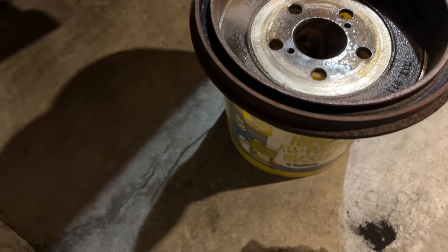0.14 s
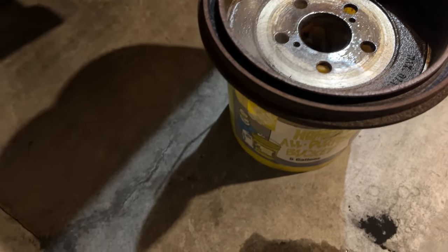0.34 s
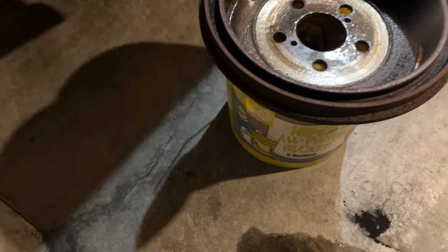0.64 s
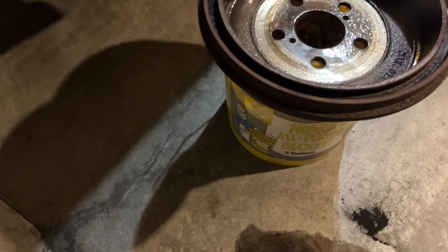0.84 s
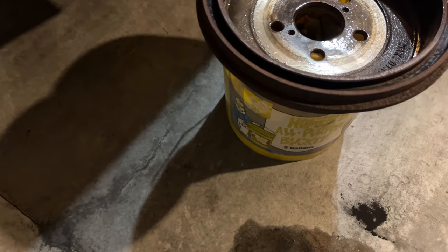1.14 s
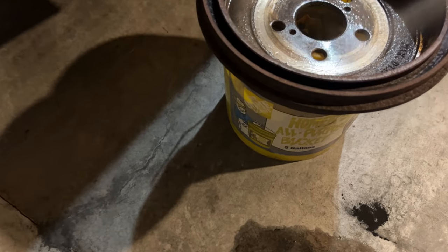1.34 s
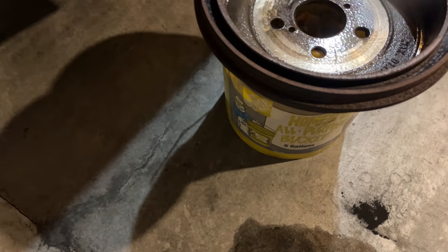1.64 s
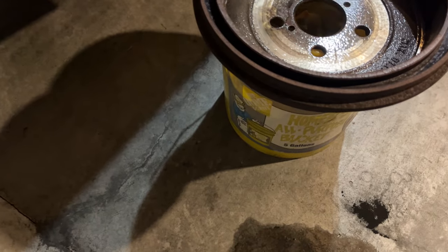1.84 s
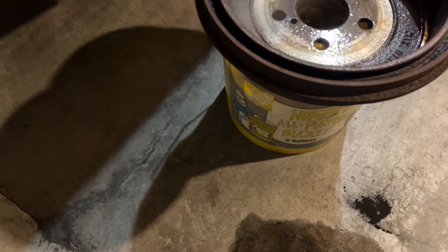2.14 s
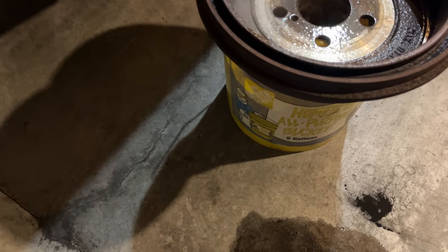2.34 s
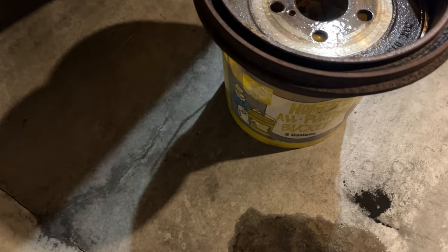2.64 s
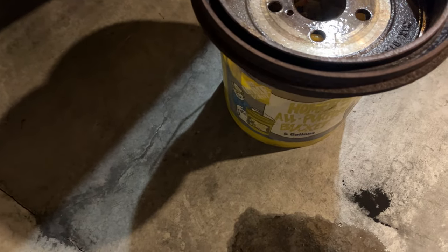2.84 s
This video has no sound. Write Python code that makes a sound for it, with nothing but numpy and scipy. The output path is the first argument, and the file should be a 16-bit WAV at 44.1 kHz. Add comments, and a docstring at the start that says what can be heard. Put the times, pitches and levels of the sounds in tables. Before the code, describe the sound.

An aerosol spray hisses abruptly into a metal brake drum from about 0.04 to 0.92 s, bright and finely sputtering, with rougher, splashy buffeting around 0.43-0.75 s. It cuts off, leaving a short garage tail and faint low rumble. From 1.17 s a longer, more hollow-coloured hiss runs to the end near 3 s, its resonances shifting as the jet moves, with faint low bottle-like flutters around 1.2-1.9 s.

```python
"""In a garage, an aerosol can sprays a metal brake drum lying on a bucket: a short burst, then a longer one.
The hiss is noise with droplet ticks, coloured by the drum's air and combed by reflections that follow the hand.
Resonant bands glide through it; buffeting on an edge adds low turbulence and a bright splash of noise.
The hollow under the drum is a wavering sine, like a blown bottle.
A short noise tail makes the garage ring, over a steady low rumble of filtered noise."""
import sys
import numpy as np
from scipy import signal
from scipy.fft import rfft, irfft, next_fast_len
from scipy.io import wavfile
from scipy.ndimage import map_coordinates

SR = 44100
rng = np.random.default_rng(int(sys.argv[2]) if len(sys.argv) > 2 else 0)


def wav_out(sig):
    """Save sig, one row per channel (or a flat mono array), as 16-bit PCM at SR to the path in sys.argv[1]."""
    wavfile.write(sys.argv[1], SR, np.round(np.clip(np.atleast_2d(sig).T, -1, 1) * 32767).astype(np.int16))


N = 132300
T = np.arange(N) / SR
SIZE = next_fast_len(N + SR)  # padded so that filter tails have room
HZ = np.maximum(np.arange(SIZE // 2 + 1) * SR / SIZE, 1)


def from_db(db):
    """Decibels to gain."""
    return 10 ** (np.asarray(db) / 20)


def rms_one(x):
    """Scale to rms 1."""
    return x / np.sqrt(np.mean(x ** 2) + 1e-20)


def in_time(rows):
    """Draw a table's automation curve at every sample."""
    return np.interp(T, *np.transpose(rows))


def in_hz(rows, axis=1):
    """Draw one column of a table at every frequency, along a log frequency axis."""
    rows = np.array(rows)
    return np.interp(np.log(HZ), np.log(rows[:, 0]), rows[:, axis])


def filtered(x, response):
    """Apply a frequency response."""
    return irfft(rfft(x, SIZE) * response, SIZE)[..., :N]


def noise(response):
    """Two unrelated coloured noises, together of rms 1."""
    return rms_one(filtered(rng.standard_normal((2, SIZE)), response))


def resonance(hz, width_hz):
    """Response of one resonance, 1 on top."""
    return 1 / (1 + 1j * (HZ / hz - hz / HZ) * hz / width_hz)


def drift(hz):
    """Random wander, mostly slower than the given rate, spread about 1."""
    return noise(1 / (1 + (HZ / hz) ** 2))[0]


def gate(start, end, attack, release):
    """Swell softly, hold and die away; all arguments in seconds."""
    swell = (1 - np.exp(-np.maximum(T - start, 0) / attack)) ** 2
    fade = np.exp(-np.maximum(T - end, 0) / release)
    return swell * fade


# Colour of the garage's background: f/Hz, level/dB (per Hz, relative)
RUMBLE_COLOUR = [(20, -31), (38, -13.5), (58, 0.5), (75, -3), (110, -7.5), (170, -18), (270, -28),
                 (900, -49), (1800, -30), (2700, -48), (4500, -46), (9000, -46), (16000, -59.5)]
RUMBLE_DB = -53.5


def garage_rumble():
    """Steady broadband noise, heaviest in the bass, as the bed of the garage."""
    return from_db(RUMBLE_DB) * noise(from_db(in_hz(RUMBLE_COLOUR)))


# Spells with the valve held down: start t/s, end t/s
VALVE_PRESSES = [(0.039, 0.92), (1.169, 3.1)]
ATTACK_S, RELEASE_S = 0.01, 0.012


def valve_gates():
    """Each press lets the spray swell quickly and each release lets it die away."""
    return [gate(start, end, ATTACK_S, RELEASE_S) for start, end in VALVE_PRESSES]


# Strength of the hiss as the jet wanders over the metal: t/s, level/dB
JET_FLOW = [(0.05, -2.5), (0.09, 0.5), (0.28, 1), (0.425, 4), (0.445, 4), (0.56, 3.5), (0.71, -0.5),
            (0.745, 2), (0.9, -0.8), (1.19, 0), (1.45, 1.9), (1.6, -0.9), (1.73, 1.4), (1.83, -0.05),
            (2.26, 3), (2.5, 0.95), (2.79, 0.5), (3.0, -1)]
# Colour of the jet: f/Hz, level/dB (per Hz, relative)
JET_COLOUR = [(60, -22), (200, -11.5), (330, -13), (520, -12.5), (800, -11.5), (1200, -13), (2100, -10),
              (3000, -7), (4400, -4), (5000, -4), (5600, -5), (6400, -4), (7400, 2), (8400, -7),
              (9400, 0.5), (11000, -1.34), (12900, 2), (14000, 0.3), (14800, -4), (15600, -1)]
# Air resonances of the drum: f/Hz, width f/Hz, level/dB re plain hiss in the first burst, in the second
DRUM_MODES = [(533, 85, 1, 3), (1250, 112, 5.5, 9), (1624, 240, 6, 11.5), (1890, 120, 2.5, 7),
              (2396, 210, 1, 3), (3230, 96, -1.5, -5), (3600, 250, -3, -8.5), (4060, 200, -10, -2.5),
              (4650, 160, 2.5, -3), (5660, 130, -5, 5.5), (6000, 160, 3, -25)]
HISS_DB = -28
DROPS_PER_S, DROP_SPREAD_DB, DROPS_DB = 2500, 4.5, -7.5  # last one relative to the raw hiss


def jet(press):
    """Gas turbulence hisses and droplets tick; the air in the drum resonates with both."""
    size_db = DROP_SPREAD_DB * np.minimum(rng.exponential(1, (2, N)), 5)
    sizes = from_db(size_db) * rng.choice([-1, 1], (2, N))
    landed = rng.random((2, N)) < DROPS_PER_S / SR
    drops = rms_one(sizes * landed)
    stream = rng.standard_normal((2, N)) + from_db(DROPS_DB) * drops
    # plain hiss and modes add as powers
    mode_power = sum(np.abs(from_db(db[press]) * resonance(hz, width)) ** 2
                     for hz, width, *db in DRUM_MODES)
    colour = from_db(in_hz(JET_COLOUR)) * np.sqrt(1 + mode_power)
    return from_db(HISS_DB + in_time(JET_FLOW)) * rms_one(filtered(stream, colour))


# Bands that ring (+) or cancel (-) while the jet crosses one part of the drum:
# start t/s, end t/s, from f/Hz, to f/Hz, width f/Hz, level/dB
BAND_SWEEPS = [ (0.0, 0.423, 2790, 2490, 170, 4.5), (0.0, 0.33, 3170, 3160, 140, -10),
               (0.0, 0.413, 4970, 4960, 190, -10), (0.0, 0.42, 6160, 6700, 170, -5),
               (0.0, 0.3, 3700, 4080, 160, 3), (0.2, 0.44, 1910, 1770, 140, 5.5),
               (0.28, 0.58, 4270, 4430, 292, 5.5), (0.55, 0.93, 11700, 11640, 220, 2),
               (0.68, 0.928, 3300, 3400, 170, 4.5), (0.72, 0.93, 5440, 5600, 140, 10),
               (1.15, 1.85, 5240, 5300, 170, 7.5), (1.9, 2.41, 5100, 5150, 202, -6.5),
               (1.95, 2.36, 4300, 4400, 400, 3.5), (2.12, 2.4, 6270, 6140, 230, 4.5),
               (2.0, 2.4, 10600, 10400, 500, 2.5), (2.38, 3.1, 1570, 1550, 70, -10),
               (2.425, 3.1, 7630, 7600, 480, 7), (2.61, 2.916, 4140, 4300, 220, 6.5)]
SWEEP_FADE_S = 0.05


def gliding_bands(x):
    """Resonant bands and notches glide through the hiss as the jet moves over the drum."""
    hz, s, spectra = signal.stft(x, SR, nperseg=1024, noverlap=768)
    gain_db = 0
    for start, end, from_hz, to_hz, width_hz, db in BAND_SWEEPS:
        held = (np.tanh((s - start) / SWEEP_FADE_S) - np.tanh((s - end) / SWEEP_FADE_S)) / 2
        centre = np.interp(s, [start, end], [from_hz, to_hz])
        bell = np.exp(-((hz[:, None] - centre) / width_hz) ** 2)
        gain_db = gain_db + db * held * bell
    return signal.istft(spectra * from_db(gain_db), SR, nperseg=1024, noverlap=768)[1][:, :N]


SPUTTER_DB, SPUTTER_HZ = 0.4, 250  # fast roughness
SURGE_DB, SURGE_HZ = 0.84, 21.3  # slower unevenness


def sputter():
    """The spray's strength flickers at random, at a fast and a slower rate."""
    return from_db(SPUTTER_DB * drift(SPUTTER_HZ) + SURGE_DB * drift(SURGE_HZ))


# Extra travel time by way of the drum's far wall: t/s, lag/ms
FAR_WALL_LAG = [(0.06, 1.49), (0.2, 1.52), (0.45, 1.82), (0.58, 1.89), (0.8, 1.85), (1.19, 1.925),
                (1.5, 1.995), (1.62, 1.945), (1.73, 1.965), (1.86, 1.88), (2.02, 1.88), (2.23, 1.955),
                (2.33, 1.89), (2.46, 1.77), (2.57, 1.76), (2.75, 1.835), (2.92, 1.79)]
# Echoes off the stepped wall: time after that lag/ms (negative is earlier), gain (negative inverts)
WALL_BOUNCES = [(-.113, -.12), (0, .2), (.075, .05), (.125, -.08)]


def drum_walls(x):
    """Short reflections comb the spray, their delays following the hand."""
    lag = in_time(FAR_WALL_LAG)
    echoes = [sum(gain * map_coordinates(side, [(T - (lag + later) / 1000) * SR], order=3)
                  for later, gain in WALL_BOUNCES)
              for side in x]
    return x + np.array(echoes)


RING_DB, RING_T60_S, RING_ABOVE_HZ = -8, 0.04, 7000


def drum_ring(x):
    """The treble rings on briefly in the drum's many narrow air modes, as a decaying noise tail."""
    high = 1 - 1 / (1 + (HZ / RING_ABOVE_HZ) ** 4)
    tail = noise(high)[0] * from_db(-60 * T / RING_T60_S)
    ring = rms_one(tail) / np.sqrt(N)  # unit energy
    return x + from_db(RING_DB) * filtered(x, rfft(ring, SIZE))


# Colour of the garage's tail: f/Hz, level/dB
TAIL_COLOUR = [(150, -5.5), (600, -9), (1500, -2.5), (2300, -4), (4300, -2), (8000, 1), (15000, -5)]
ROOM_T60_S, ROOM_TREBLE_T60_S, ROOM_SPLIT_HZ = 0.42, 0.29, 5900
ROOM_DB, ROOM_BUILD_S = -9.5, 0.0035


def garage(x):
    """Diffuse reflections build up and decay as noise, the treble dying first."""
    bass = 1 / (1 + (HZ / ROOM_SPLIT_HZ) ** 4)
    low_tail = noise(bass) * from_db(-60 * T / ROOM_T60_S)
    high_tail = noise(1 - bass) * from_db(-60 * T / ROOM_TREBLE_T60_S)
    tail = (low_tail + high_tail) * (1 - np.exp(-T / ROOM_BUILD_S))
    response = from_db(in_hz(TAIL_COLOUR)) * rfft(rms_one(tail), SIZE) / np.sqrt(N)
    return from_db(ROOM_DB) * filtered(x, response)


# How hard the hollow under the drum is blown: t/s, level/dB
HOLLOW_LEVEL = [(0.05, -84), (0.6, -53), (0.9, -62.5), (1.2, -66.5), (1.26, -53), (1.34, -50), (1.39, -62),
                (1.44, -54), (1.53, -57.5), (1.61, -46.5), (1.66, -62), (1.72, -54.5), (1.82, -58),
                (1.875, -48.5), (1.95, -57.5), (2.3, -61.5), (2.6, -67.5)]
HOLLOW_HZ, HOLLOW_WAVER_HZ, HOLLOW_WAVER_RATE_HZ = 177, 13.8, 36
HOLLOW_FLUTTER_DB = 2.5


def hollow():
    """The air under the drum sounds like a blown bottle, wavering in pitch and strength."""
    pitch = HOLLOW_HZ + HOLLOW_WAVER_HZ * drift(HOLLOW_WAVER_RATE_HZ)
    level_db = in_time(HOLLOW_LEVEL) + HOLLOW_FLUTTER_DB * drift(HOLLOW_WAVER_RATE_HZ)
    tone = np.sin(2 * np.pi * np.cumsum(pitch) / SR)
    return from_db(level_db) * rms_one(tone)


# Moments when the jet catches an edge: start t/s, length t/s, level/dB
EDGE_BUFFETS = [(0.433, 0.079, -40.5), (0.518, 0.065, -39), (0.589, 0.046, -44), (0.635, 0.053, -44.5),
                (0.732, 0.021, -45), (2.8, 0.019, -44.5)]
# Colour of the low turbulence: f/Hz, level/dB (per Hz, relative)
BUFFET_COLOUR = [(25, -22), (70, 4.5), (110, 3), (160, -5), (240, 0.5), (340, -7.5), (540, 1.5),
                 (800, -18.5), (1150, -6.5), (3000, -32)]
# Colour of the bright splash: f/Hz, level/dB (per Hz, relative)
SPLASH_COLOUR = [(1000, -19), (4000, -15), (8000, -3), (10500, 3.5), (13000, 5.5), (15500, -5)]
BUFFET_FADE_S, SPLASH_DB = 0.0054, 12.5  # splash relative to the turbulence


def buffeting():
    """Low turbulence and a bright splash while the jet is on an edge."""
    force = sum(from_db(db) * gate(start, start + length, BUFFET_FADE_S, BUFFET_FADE_S)
                for start, length, db in EDGE_BUFFETS)
    turbulence = noise(from_db(in_hz(BUFFET_COLOUR)))
    splash = noise(from_db(in_hz(SPLASH_COLOUR)))
    return force * (turbulence + from_db(SPLASH_DB) * splash)


# Phase between left and right: f/Hz, lead of the right/rad
RIGHT_LEAD = [(100, 0), (900, -.1), (1150, .65), (1380, .7), (1470, 2.7), (1650, 2.5), (1730, 0), (2600, 0),
              (3200, -.65), (5000, -.45), (5300, 1.1), (5800, 2.0), (6500, .7), (7550, 2.5), (7850, 3.14),
              (8800, 3.14), (9050, 3.7), (10000, 4.7), (11300, 6.15), (12300, 6.35), (13500, 7.5),
              (15300, 9.42)]
# Stereo image: f/Hz, left-right likeness (0 to 1), left minus right level/dB
STEREO_IMAGE = [(100, .99, 0), (450, .95, -.5), (750, .85, 3.5), (1100, .8, 5), (1300, .85, 2),
                (1420, .4, 3), (1580, .87, 1), (1690, .55, 1), (1800, .99, 0), (2400, .98, 0),
                (3200, .66, 1.7), (4100, .78, 3), (4700, .72, 4.3), (5300, .4, 3), (5650, .62, 1),
                (6150, .6, -3.7), (6550, .42, -3), (6800, .65, .8), (7300, .88, 1.2), (7850, .999, 0),
                (8800, .999, 0), (9100, .86, 0), (10800, .87, 0), (11400, .99, 0), (12300, .99, 0),
                (12600, .9, 0), (14500, .84, 0), (15300, .995, 0)]


def stereo(x):
    """A shared and an unshared part make left and right, set apart in phase and level."""
    alike = np.clip(in_hz(STEREO_IMAGE, axis=1), 0, .999)
    shared, own = filtered(x, np.sqrt([(1 + alike) / 2, (1 - alike) / 2]))
    # each side takes half of the difference
    lean = in_hz(STEREO_IMAGE, axis=2) / 2
    phase = in_hz(RIGHT_LEAD) / 2
    response = from_db([lean, -lean]) * np.exp(1j * np.array([-phase, phase]))
    return filtered(np.array([shared + own, shared - own]), response)


def scene():
    """The valve gates the sputtering spray; the drum and garage answer it over the rumble."""
    rumble = garage_rumble()
    valves = valve_gates()
    hiss = sum(valve * gliding_bands(jet(press)) for press, valve in enumerate(valves))
    blown = sum(valves) * (hollow() + buffeting())
    spray = drum_ring(drum_walls(sputter() * (hiss + blown)))
    return stereo(spray + garage(spray) + rumble)


CUTOFF_HZ = 15650


def record(dry):
    """The top is cut steeply."""
    return filtered(dry, 1 / np.sqrt(1 + (HZ / CUTOFF_HZ) ** 400))


dry = scene()
out = record(dry)
wav_out(out)
```